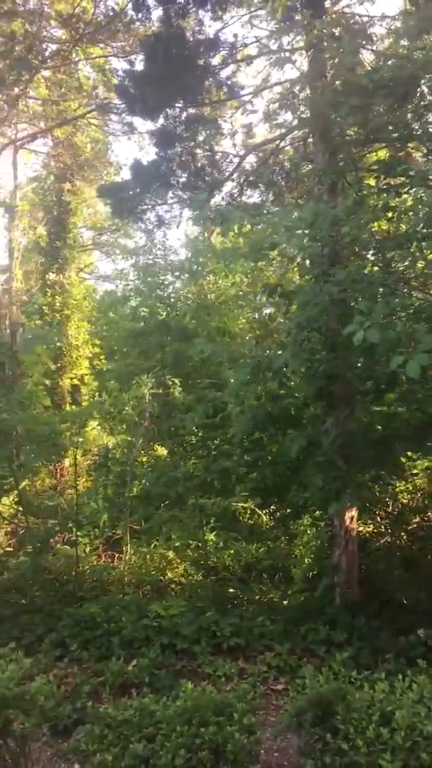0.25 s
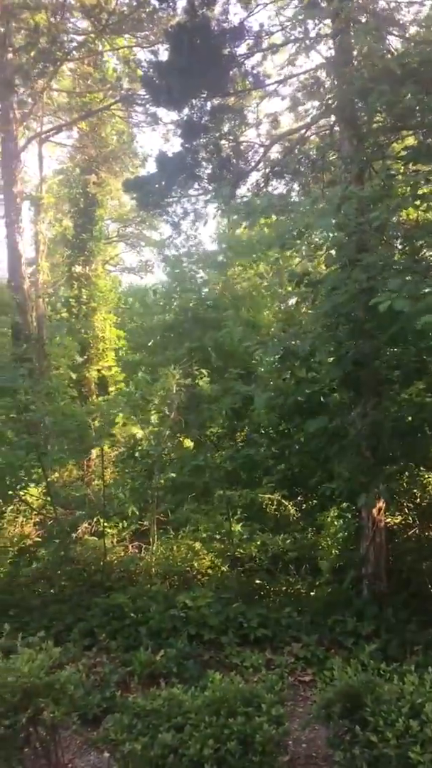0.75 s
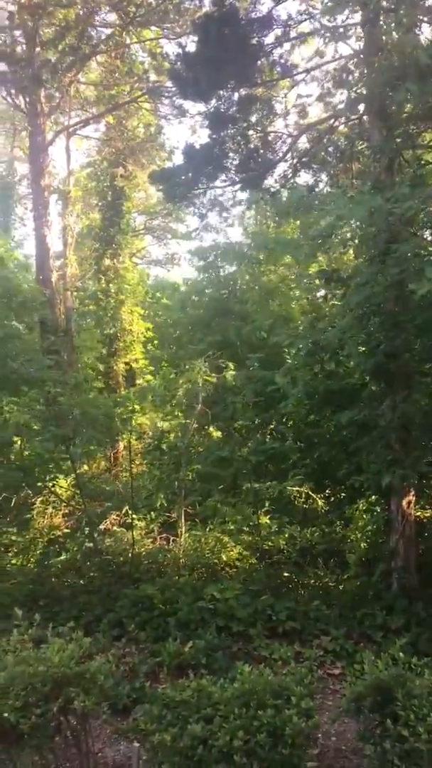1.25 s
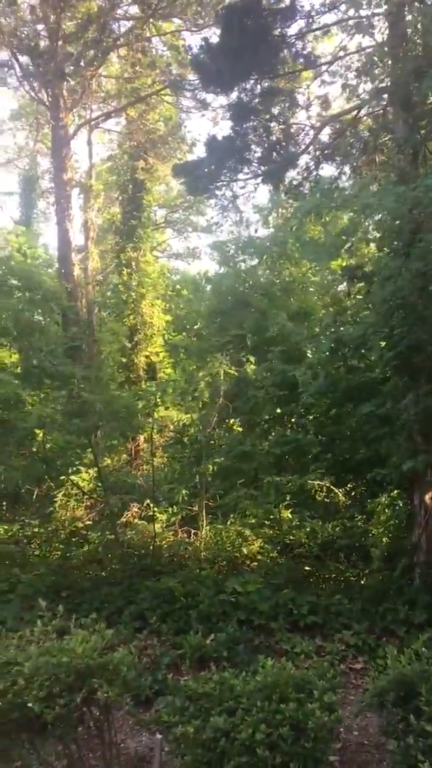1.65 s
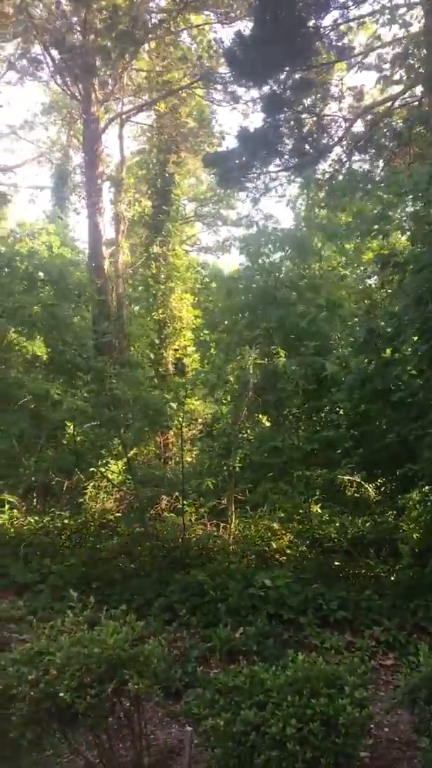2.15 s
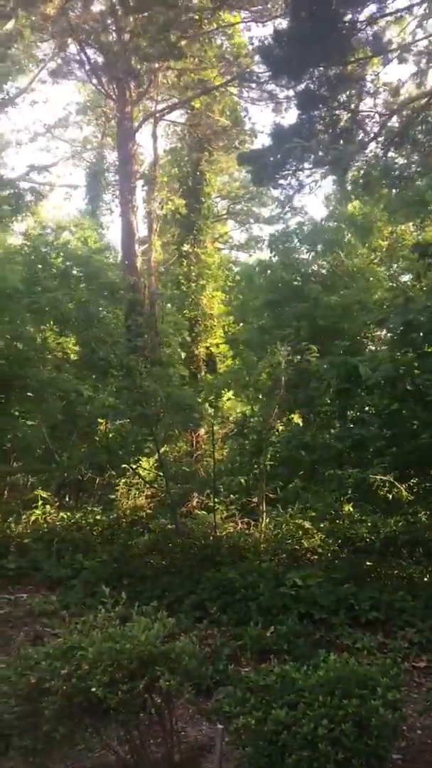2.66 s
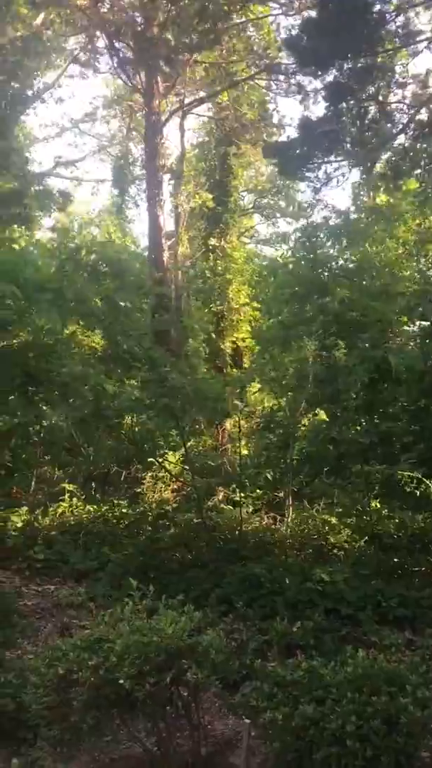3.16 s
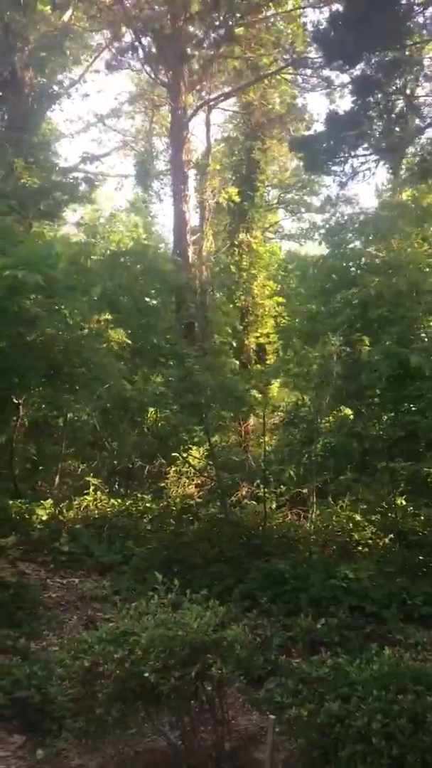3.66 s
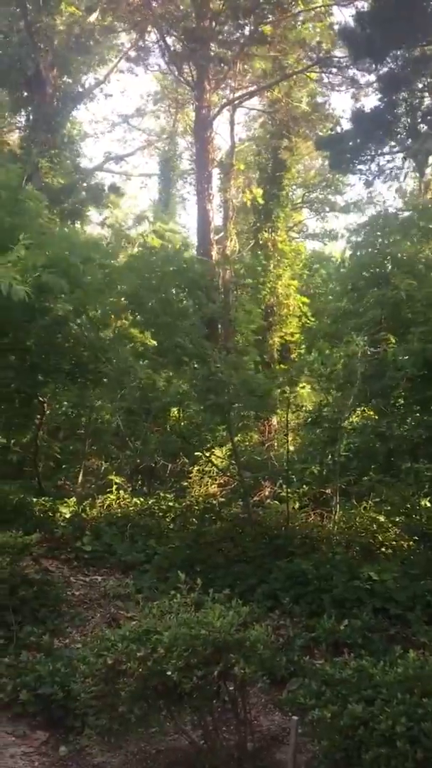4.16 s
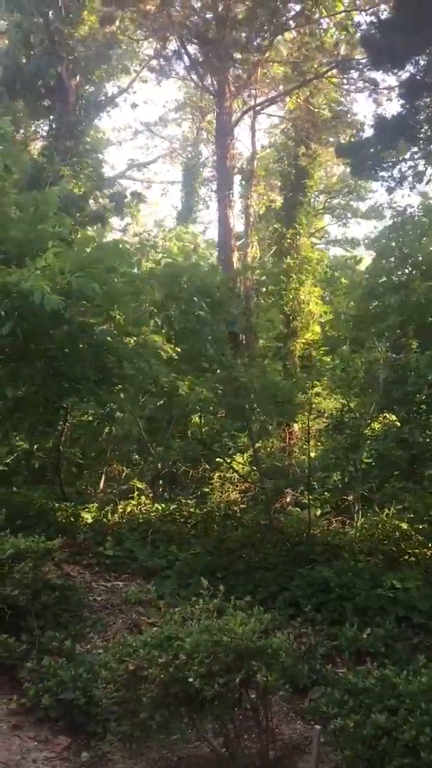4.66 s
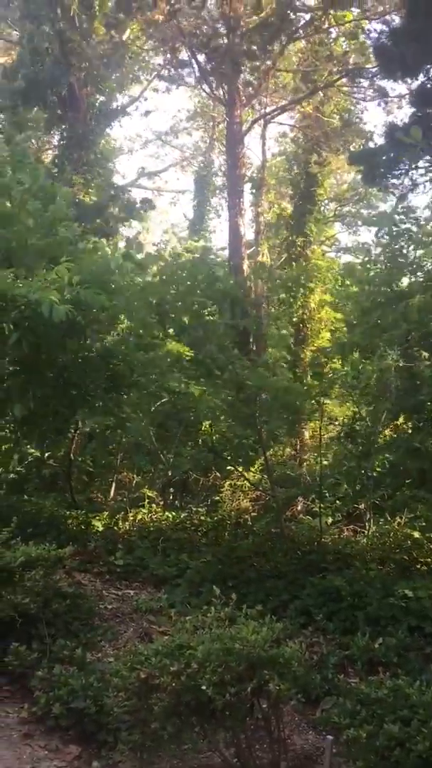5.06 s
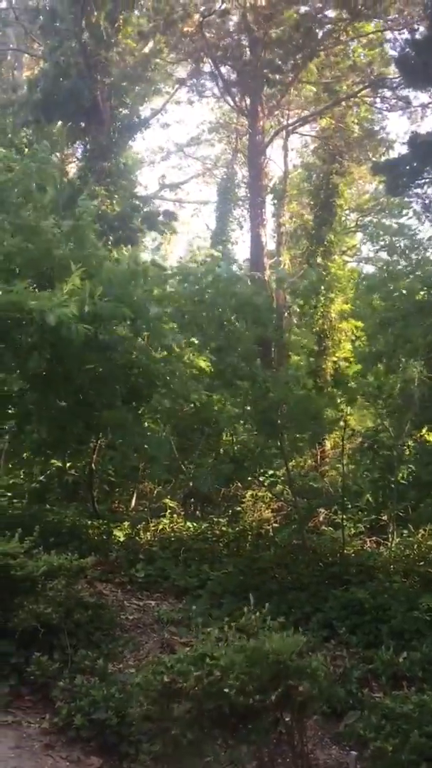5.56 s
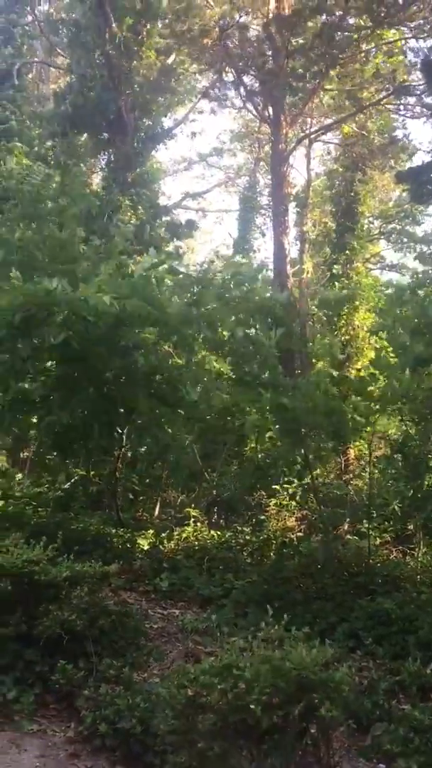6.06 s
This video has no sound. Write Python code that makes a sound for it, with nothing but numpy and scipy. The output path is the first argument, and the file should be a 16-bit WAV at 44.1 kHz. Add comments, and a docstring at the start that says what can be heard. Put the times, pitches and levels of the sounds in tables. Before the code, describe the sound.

Soft leafy wind with a distant rumble, thin high bird calls near and far, and heavy bassy wind buffeting towards the end.

```python
"""In woodland, before one microphone, wind (coloured noise) moves leaves and canopy over a distant rumble.
A far bird opens with a high trill; from about 1 s another far one falls and rises in chirrups.
Leaves brush close by at 1.7 s (decaying noise); from 1.8 s a near bird gives thin seeps and lower pipes.
The birds are bent sines with weak octaves and woodland echoes.
From about 4.5 s gusts thump on the microphone port as decaying throbs with flaps of low noise."""
import sys
import numpy as np
from scipy import signal
from scipy.fft import rfft, irfft, next_fast_len
from scipy.io import wavfile
from scipy.ndimage import uniform_filter1d, map_coordinates

SR = 44100
rng = np.random.default_rng(int(sys.argv[2]) if len(sys.argv) > 2 else 0)


def dump_mix(stems):
    """Bounce the given channels to the path in sys.argv[1] as a 16-bit WAV at rate SR."""
    frames = np.atleast_2d(stems).T  # one column per channel
    limited = np.clip(frames, -1, 1)  # hard clip at full scale
    pcm = np.round(limited * 32767).astype(np.int16)
    wavfile.write(sys.argv[1], SR, pcm)


def elevation(decibels):
    """Turn decibel levels (scalar or array-like) into linear amplitude ratios."""
    levels = np.asarray(decibels, float)
    return 10 ** (levels / 20)


N = 277830  # samples, 6.3 s


def unit(x):
    """x scaled to rms 1."""
    return x / np.sqrt(np.mean(x ** 2) + 1e-20)


def along(points, hz):
    """(frequency [Hz], value) points read on a log frequency axis."""
    f, v = np.transpose(points)
    return np.interp(np.log(hz + 1), np.log(f + 1), v)


def wobble(rate):
    """A smooth random curve through normal knots, rate of them a second."""
    return map_coordinates(rng.standard_normal(N // 100), [np.arange(N) * rate / SR])


def filtered(x, response):
    """x with its spectrum multiplied by a response of frequency."""
    m = next_fast_len(N + SR // 2)
    return irfft(rfft(x, m) * response(np.fft.rfftfreq(m, 1 / SR)), m)[:N]


def rush(spectrum, patchy_db, bins=2, frames=3):
    """Coloured noise of rms 1, whose narrow bands briefly swell and dip at random."""
    z = signal.stft(rng.standard_normal(N), nperseg=1024)[2]
    field = rng.standard_normal(z.shape)
    field = uniform_filter1d(uniform_filter1d(field, bins, axis=0), frames, axis=1)
    noise = signal.istft(z * elevation(patchy_db * unit(field)), nperseg=1024)[1][:N]
    return unit(filtered(noise, lambda hz: elevation(along(spectrum, hz))))


def add(track, s, sound):
    """Mix a sound into the track from time s."""
    part = track[round(s * SR):][:len(sound)]
    part += sound[:len(part)]


def syrinx(hz, gain, overtone_db):
    """A bird's voice: a sine on a pitch curve with a weak octave."""
    phase = 2 * np.pi * (np.cumsum(hz) / SR + rng.random())
    return np.sqrt(2) * gain * (np.sin(phase) + elevation(overtone_db) * np.sin(2 * phase))


def whistles(notes, arch_hz, burr_share):
    """Thin bent notes with soft ends, a slight random burr in pitch and a flickering level."""
    track = np.zeros(N)
    burr = 1 + burr_share * wobble(250)
    for s, length, middle_hz, glide_hz, db in notes:
        u = np.linspace(0, 1, round(length * SR))
        bend = middle_hz + glide_hz * (u - .5) - arch_hz * (2 * u - 1) ** 2
        bend = bend * burr[round(s * SR):][:len(u)]
        soft_ends = np.sin(np.pi * u).clip(0) ** .6
        add(track, s, syrinx(bend, elevation(db) * soft_ends, overtone_db=-22))
    return track * elevation(3 * wobble(90))


# high seeps of the near bird, before burr and flicker:
# (time [s], length [s], middle pitch [Hz], glide from start to end [Hz], level [dB])
SEEP_NOTES = [(1.815, 0.044, 7010, 350, -54), (2.613, .044, 6930, 350, -52),
              (3.45, 0.048, 7340, 265, -40.5), (4.0, 0.034, 7100, 250, -55), (4.016, .048, 7975, -475, -46),
              (4.545, 0.065, 7300, 200, -49), (5.094, 0.064, 7236, 680, -47)]


def seeps():
    """Near, high whistles whose middle arches above the line between their ends."""
    return whistles(SEEP_NOTES, arch_hz=125, burr_share=.009)


# lower whistles of the near bird, before burr and flicker:
# (time [s], length [s], middle pitch [Hz], glide from start to end [Hz], level [dB])
PIPE_NOTES = [(1.797, .078, 4180, -240, -55), (1.878, 0.063, 4070, 0, -54), (2.533, 0.07, 5460, -125, -53)]


def pipes():
    """Near, plain lower whistles that glide straight or stay level."""
    return whistles(PIPE_NOTES, arch_hz=0, burr_share=.005)


def syllables(s, gap, db, held_hz, held_db, flick_db):
    """The six notes of one chirrup as (time [s], length [s], start [Hz], end [Hz], level [dB])."""
    low_hz = 2428 + 19000 * gap  # slower phrases stay higher
    top_hz = held_hz - 250
    held_s, held_sag_hz = .029, 91
    fall_s, fall_hz, fall_db = 0.0184, 856, -2  # upper half of the fall, level against the phrase
    break_share, drop_s, drop_hz, drop_db = 0.39, 0.017, 553, -1  # lower half, by share of the gap
    sweep_s, sweep_to_hz = .027, 4076
    flick_after_s, flick_s, flick_from_hz, flick_to_hz = 0.026, 0.0216, 136, 3970
    tail_under_hz, tail_db = 199, -4.5  # a weak falling note closes the phrase
    return [(s - held_s, held_s, held_hz + held_sag_hz / 2, held_hz - held_sag_hz / 2, held_db),
            (s, fall_s, top_hz, top_hz - fall_hz, db + fall_db),
            (s + break_share * gap, drop_s, low_hz + drop_hz, low_hz, db + drop_db),
            (s + gap, sweep_s, low_hz, sweep_to_hz, db),
            (s + gap + flick_after_s, flick_s, low_hz + flick_from_hz, flick_to_hz, flick_db),
            (s + gap + 2 * flick_after_s, flick_s, low_hz + drop_hz, low_hz - tail_under_hz, db + tail_db)]


# phrases of the far chirruping bird, before burr and flicker: (start of the fall [s],
# fall to upsweep [s], level [dB], held note [Hz], held note level [dB], last flick level [dB])
CHIRRUP_PHRASES = [(1.08, 0.022, -52, 4970, -59, -56), (1.85, 0.025, -51.5, 5040, -63, -53),
                   (2.195, 0.026, -52.5, 5140, -51.5, -63), (2.569, 0.038, -53.5, 5400, -64, -53),
                   (3.185, 0.042, -51, 5100, -60.5, -56), (3.69, 0.028, -50, 5000, -54.5, -53),
                   (4.18, .046, -50.5, 5000, -65, -65), (4.682, .057, -54, 5000, -62, -62),
                   (5.244, 0.031, -50.5, 4980, -59, -54), (5.823, 0.025, -53.5, 4820, -58, -53)]


def chirrups():
    """Far phrases: a held high note, a rough broken fall, then quick cleaner upsweeps and a weak tail."""
    track = np.zeros(N)
    burr = wobble(300)
    notes = [note for phrase in CHIRRUP_PHRASES for note in syllables(*phrase)]
    for s, length, start_hz, end_hz, db in notes:
        u = np.linspace(0, 1, round(length * SR))
        # falls are the roughest, held notes the cleanest
        roughness = .05 if end_hz > start_hz else .16
        burr_hz = 55 + roughness * abs(end_hz - start_hz)
        glide = start_hz + (end_hz - start_hz) * u + burr_hz * burr[round(s * SR):][:len(u)]
        soft_ends = np.sqrt(np.sin(np.pi * u).clip(0))
        add(track, s, syrinx(glide, elevation(db) * soft_ends, overtone_db=-38))
    return track * elevation(2.5 * wobble(150))  # the level flickers


# notes of the far trill, before pulsing: (time [s], level [dB])
TRILL_NOTES = [(.029, -56), (.13, -54.5), (.196, -59), (.265, -55.5), (.378, -55), (.468, -57),
               (.555, -58.5), (.67, -57)]


def trill():
    """Far fast-pulsing notes, each flicking up at its start; the pitch sags towards the end."""
    note_s, start_hz, sag_from_s, sag_hz_per_s, pulse_hz = 0.036, 6440, 0.31, 630, 65
    track, t = np.zeros(N), np.arange(0, note_s, 1 / SR)
    burr = 1 + .009 * wobble(250)
    for s, db in TRILL_NOTES:
        hz = start_hz - sag_hz_per_s * max(s - sag_from_s, 0)
        flick_up = 1 - 0.055 * np.exp(-t / 0.0081)
        pitch = hz * flick_up * burr[round(s * SR):][:len(t)]
        pulsing = 1 + .5 * np.cos(2 * np.pi * pulse_hz * t)
        soft_ends = np.sin(np.pi * t / note_s) ** 0.35
        add(track, s, syrinx(pitch, elevation(db) * pulsing * soft_ends, overtone_db=-29.5))
    return track


# answer of the trees at reach 1: (frequency [Hz], time to fall 60 dB [s])
TREE_DECAY = [(2500, 0.21), (5000, 0.41), (8000, 0.32)]


def woods(x, reach):
    """Scattered echoes from trunks and leaves as decaying noise, longer with reach; high treble dies sooner."""
    hz, t, z = signal.stft(rng.standard_normal(SR // 2), SR, nperseg=256)
    t60 = reach * along(TREE_DECAY, hz)[:, None]
    tail = signal.istft(z * elevation(-60 * t / t60), SR, nperseg=256)[1]
    delayed = np.pad(x, (200, 0))  # samples
    return signal.fftconvolve(delayed, tail / np.linalg.norm(tail))[:N]


# gusts on the port, before flattening; throb rate before unsteadiness, fall time for the throb:
# (time [s], time to fall 60 dB [s], throb [Hz], throb level [dB], flap level [dB])
PORT_GUSTS = [(4.474, 0.099, 87, -36.5, -53), (4.501, 0.12, 95, -39, -65), (4.533, 0.11, 65, -33, -62),
              (4.62, 0.17, 75, -47, -70), (4.72, 0.084, 73.4, -28.5, -46), (4.748, 0.15, 123, -34.5, -42),
              (4.788, .103, 73.5, -33, -45), (4.821, 0.22, 68.5, -36.5, -46), (4.974, 0.069, 115, -25, -38),
              (4.99, 0.21, 77, -29, -44), (5.04, .085, 79, -37, -45.5), (5.355, .068, 110, -38, -43),
              (5.385, 0.085, 80, -37, -52.5), (5.517, 0.13, 86, -29.5, -46.5),
              (5.613, .091, 73.4, -36, -45), (5.732, 0.13, 107, -32.5, -28.5),
              (5.759, .177, 74, -34.5, -60), (5.819, .146, 76, -38, -48), (5.904, 0.24, 72, -27, -39),
              (5.954, 0.21, 74.3, -21.5, -30), (5.989, 0.14, 74, -26, -38), (6.018, .275, 71, -28.5, -47),
              (6.192, .067, 67.4, -23, -40.5)]


def gusts():
    """Each eddy sets the microphone's bass resonance throbbing unevenly and flaps at its onset."""
    rise_cycles, flap_shorter = 0.62, 0.67  # a gust builds within a throb; the flap dies sooner
    throbs, flaps, t = np.zeros(N), np.zeros(N), np.arange(SR // 2) / SR
    unsteady = 1 + .13 * wobble(45)
    for s, t60, hz, db, flap_db in PORT_GUSTS:
        rise = rise_cycles / hz
        onset = np.sin(np.pi / 2 * np.clip(t / rise, 0, 1)) ** 2
        after = np.maximum(t - rise, 0)
        rate = hz * np.resize(unsteady[round(s * SR):], len(t))
        cycles = np.cumsum(rate) / SR + rng.random()
        throb = np.sqrt(2) * np.sin(2 * np.pi * cycles)
        add(throbs, s, onset * elevation(db - 60 * after / t60) * throb)
        add(flaps, s, onset * elevation(flap_db - 60 * after / (flap_shorter * t60)))
    # (frequency [Hz], relative level [dB])
    flap_colour = [(60, -35), (130, 1.0), (200, 1.5), (350, -7.5), (600, -11.5), (900, -23),
                   (2000, -56), (6000, -120)]
    pressure = throbs + flaps * rush(flap_colour, patchy_db=-0.5)
    return pressure / (1 + np.abs(pressure / .11) ** 4) ** .25  # the strongest pushes flatten off


# close leaf strokes, before flicker: (time [s], time to fall 60 dB [s], starting level [dB])
LEAF_STROKES = [(1.699, 0.31, -50.5), (1.712, 0.143, -53), (1.735, .2, -60)]


def rustles():
    """A few leaves close by brush together: decaying noise with a quickly flickering level."""
    strokes, t = np.zeros(N), np.arange(SR // 4) / SR
    for s, t60, db in LEAF_STROKES:
        add(strokes, s, elevation(db - 60 * t / t60))
    return strokes * elevation(1.8 * wobble(120)) * rush(LEAF_COLOUR, patchy_db=0.0)


# colour of the leaves, for rustles, flutter and hiss: (frequency [Hz], relative level [dB])
LEAF_COLOUR = [(1290, -3), (2200, -4.5), (2570, -5.5), (4200, -2), (4910, -7.5), (5690, -4.5), (7580, -9.5),
               (9000, -9), (10400, -16.5), (12400, -17), (15600, -26)]


def flutter(count=9000):
    """Leaves tap each other: a dense patter of short ticks of uneven size."""
    when, size = rng.random(count), rng.standard_normal(count)
    ticks = np.bincount((when * N).astype(int), size, N)
    return unit(filtered(ticks, lambda hz: elevation(along(LEAF_COLOUR, hz))))


def leaf_hiss(swell):
    """Far leaves hiss almost steadily, swelling slightly with the canopy and on their own."""
    return elevation(-51.5 + 0.72 * swell + 0.36 * wobble(11)) * rush(LEAF_COLOUR, patchy_db=2.5)


# colour of the canopy: (frequency [Hz], relative level [dB])
CANOPY_COLOUR = [(210, -17), (350, -5.5), (450, -5), (527, -1), (690, 0.5), (1070, 1), (2800, -9),
                 (3640, -13), (6160, -120)]
# roar of the canopy, before swells: (time [s], level [dB])
CANOPY_LEVEL = [(0, -50.5), (.5, -49), (1.1, -49), (2.3, -49), (2.85, -50), (4.0, -47.5), (5.05, -49.5),
                (5.75, -48), (6.0, -51.5), (6.3, -49.5)]


def canopy_roar(swell):
    """Wind through the canopy: mid-range noise that swells partly with the leaves."""
    level_db = np.interp(np.arange(N) / SR, *np.transpose(CANOPY_LEVEL))
    return elevation(level_db + 0.17 * swell + 0.58 * wobble(8)) * rush(CANOPY_COLOUR, patchy_db=2.5)


# colour of the distant rumble: (frequency [Hz], relative level [dB])
RUMBLE_COLOUR = [(15, -45), (25, -9.5), (59, 1), (112, 0), (237, -9), (341, -12.5), (450, -21.5),
                 (580, -28.5), (990, -120)]
# distant rumble, before its own swells: (time [s], level [dB])
DISTANT_LEVEL = [(0, -52), (.4, -46.5), (1.2, -48.5), (2.0, -47.5), (2.42, -51.5), (3.2, -48), (3.8, -51),
                 (4.05, -48), (4.45, -61.5), (4.95, -51.5), (5.25, -58.5), (5.5, -50), (5.95, -51),
                 (6.3, -47.5)]


def distant_rumble():
    """Low noise from a distance, with swells of its own."""
    level_db = np.interp(np.arange(N) / SR, *np.transpose(DISTANT_LEVEL))
    return elevation(level_db + 1.85 * wobble(7)) * rush(RUMBLE_COLOUR, patchy_db=1.3)


def wind():
    """Canopy and leaf hiss share one swell over the rumble and a faint patter of leaves."""
    swell = wobble(5.0)
    return distant_rumble() + canopy_roar(swell) + leaf_hiss(swell) + elevation(-63) * flutter()


def scene():
    """One microphone feeds both channels; far birds arrive almost half as echoes."""
    near = seeps() + pipes()
    far = chirrups() + trill()
    near_echoes = elevation(-6) * woods(near, reach=.8)
    far_echoes = elevation(-1) * woods(far, reach=1.2)
    birds = near + near_echoes + far + far_echoes
    return np.tile(birds + gusts() + rustles() + wind(), (2, 1))


def band_limit(x):
    """A steep low-pass at the top of the band."""
    return signal.sosfilt(signal.butter(12, 15730, fs=SR, output="sos"), x)


def record(dry):
    """The microphone rolls off the deepest bass; the finished mix holds nothing above the top frequency."""
    bass_hz, top_hz = 42, 15730

    def passed(hz):
        """Gain at each frequency: the bass roll-off and an end to the treble."""
        bass_rolloff = 1 / np.sqrt(1 + (bass_hz / (hz + 1)) ** 8)
        return (hz < top_hz) * bass_rolloff

    mix = np.array([filtered(side, passed) for side in dry])
    return band_limit(mix)


dry = scene()
out = record(dry)
dump_mix(out)
```